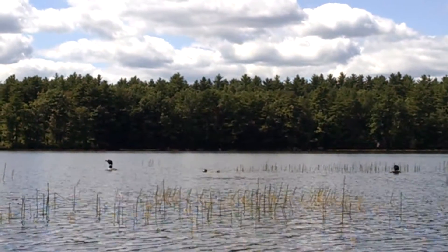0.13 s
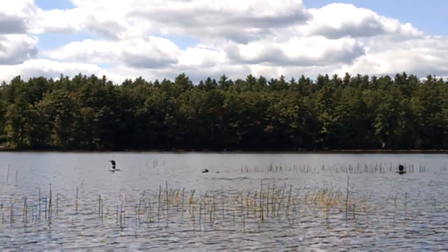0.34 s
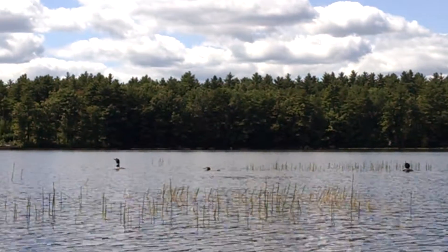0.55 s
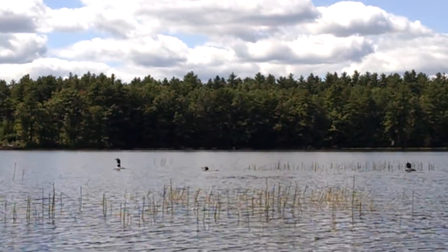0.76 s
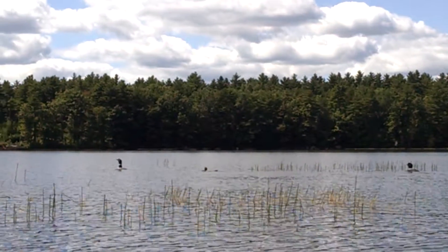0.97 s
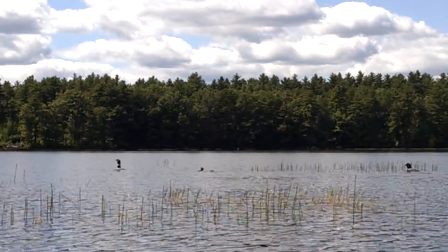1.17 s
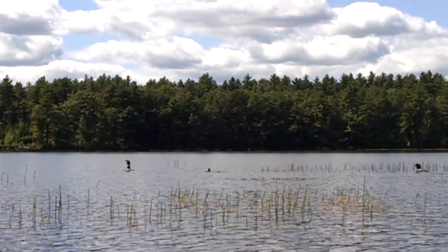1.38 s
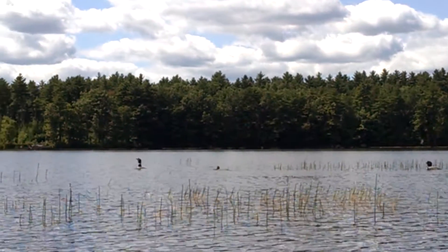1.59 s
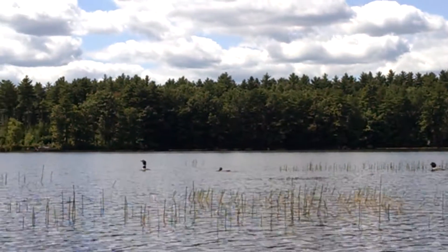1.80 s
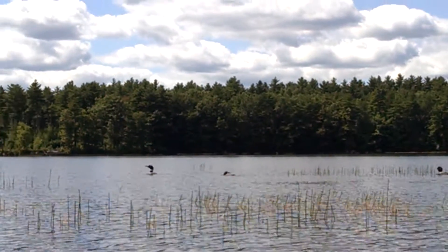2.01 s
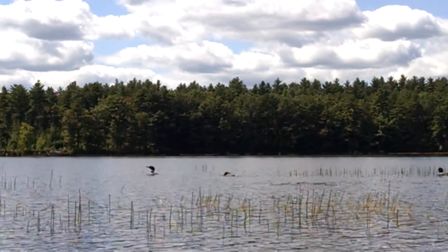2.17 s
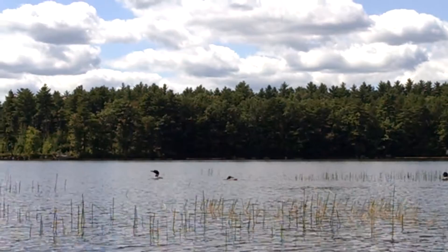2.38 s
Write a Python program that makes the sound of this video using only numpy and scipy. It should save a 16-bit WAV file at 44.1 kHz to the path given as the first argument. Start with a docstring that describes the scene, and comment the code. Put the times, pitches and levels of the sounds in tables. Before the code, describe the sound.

One clear, flute-like loon wail on an open lake: rising note, abrupt break to a higher held note, falling end. Faint wooded-shore echo on the right, quiet outdoor air, low drone and small wind thumps in a stereo microphone.

```python
"""A loon wails once across a calm lake, over wind in the microphone ports, a faint hush and a low drone.
It opens on a low glide, breaks into a rising note that first doubles its period, breaks up to a
high note with small ticks, and breaks back down to a falling one: all stacks of gliding sine harmonics.
From 0.765 s the wooded far shore on the right returns the call, dulled, delayed and blurred.
Wind and hush are shaped noise, the wind thumping in four gusts; the drone is noise through a resonator."""
import sys
import numpy as np
from scipy import signal
from scipy.fft import rfft, irfft, next_fast_len
from scipy.io import wavfile

SR = 44100
rng = np.random.default_rng(int(sys.argv[2]) if len(sys.argv) > 2 else 0)


def transcribe(u):
    """Save the signal u as a 16-bit wav file named by the first command-line argument.

    u: samples, shape (n,) or (channels, n), limited to [-1, 1]; the rate is SR.
    q: integer samples, one column per channel.
    """
    v = np.clip(np.atleast_2d(u).T, -1, 1)
    q = np.round(v * 32767).astype(np.int16)
    wavfile.write(sys.argv[1], SR, q)


N = 108045
T = np.arange(N) / SR  # s

# Voice breaks and the end of the call, and the length of each crossfade (s)
FIRST_BREAK_S, BREAK_UP_S, BREAK_DOWN_S, END_S, BREAK_FADE_S = .207, .842, 1.587, 1.915, 0.0075
UPPER_FLICKER_DB = 1.2  # spread of the flicker in the upper harmonics
# Small ticks in the high note. Each row: start in seconds, peak level in dB.
TICKS = [(0.912, -50), (.995, -49), (1.066, -50), (1.167, -47), (1.228, -49), (1.292, -49), (1.336, -53),
         (1.38, -54), (1.46, -49), (1.529, -50)]


def from_db(db):
    """Decibels to gain."""
    return 10 ** (np.asarray(db) / 20)


def rms_one(x):
    """Scale to unit rms."""
    return x / np.sqrt(np.mean(x ** 2) + 1e-20)


def in_time(rows):
    """Columns of a table as curves over time; the first column is seconds."""
    s, *columns = np.transpose(rows)
    return [np.interp(T, s, c) for c in columns]


def at_hz(points, hz):
    """Read a spectrum on a log-frequency axis."""
    table_hz, values = np.array(points).T
    return np.interp(np.log(np.maximum(hz, 1)), np.log(table_hz), values)


def drift(rate_hz):
    """Slow chance of unit spread: white noise through two equal one-pole low-passes."""
    r = np.exp(-2 * np.pi * rate_hz / SR)
    noise = rng.standard_normal(N + SR)
    return rms_one(signal.lfilter([1], [1, -2 * r, r * r], noise)[SR:])  # filter settles for 1 s


def low_pass(x, cut_hz):
    """Gentle second-order low-pass."""
    return signal.sosfilt(signal.butter(2, cut_hz, fs=SR, output="sos"), x)


def gate(start, end):
    """On and off with short linear fades centred on start and end."""
    fade_in = np.clip((T - start) / BREAK_FADE_S + .5, 0, 1)
    fade_out = np.clip((end - T) / BREAK_FADE_S + .5, 0, 1)
    return fade_in * fade_out


def bump(peak_s, before_s, after_s):
    """A Gaussian hump with its own width on either side of the peak."""
    return np.exp(-((T - peak_s) / np.where(T < peak_s, before_s, after_s)) ** 2)


def loon():
    """Four notes joined by voice breaks, plus the ticks of the high note."""
    opening = opening_note() * gate(-1, FIRST_BREAK_S)
    rise = rising_note() * gate(FIRST_BREAK_S, BREAK_UP_S)
    high, high_phase = high_note()
    high = high * gate(BREAK_UP_S, BREAK_DOWN_S)
    fall = falling_note() * gate(BREAK_DOWN_S, END_S)
    return opening + rise + high + fall + ticks(high_phase)


def note(rows, upper_db, sag=0, dulled_db=0):
    """A slightly wavering harmonic stack coloured by the throat; returns the sound and its phase."""
    # Throat colour the upper harmonics slide through. Each row: frequency in Hz, gain in dB.
    throat = [(1700, -11), (1870, -6), (2000, 6.5), (2300, 3), (2450, 2.5), (2620, -14), (3550, -9.5),
              (3670, 1.5), (3800, -5), (4250, -5.5), (4340, -11.5), (4470, 3.5), (4600, 9), (4780, 6),
              (4900, 8.5), (4970, -2.5), (5000, 11.5), (5110, -0.5), (5250, -8), (5550, 2), (5680, -25),
              (8000, 6), (8250, -3), (8600, 5), (8720, 1.5), (8900, 9.5), (9400, -3), (10200, 5.5),
              (10600, -8), (11700, -7), (12100, 5.5)]
    WAVER_HZ, WAVER_DB = .9, .25  # spread of pitch and level
    SAG_HZ, SAG_DB = 5.8, 1.3  # drop in pitch and level at full sag
    ROUGH_DB, UPPER_ROUGH_DB, ROUGH_HZ = -44, -19.5, 250  # fast random roughness of level and its rate
    EFFORT_BRIGHTENS = 0.42  # extra dB of the upper harmonics per dB of the second
    DULLS_ABOVE_HZ = 4500

    hz, first_db, second_db = in_time(rows)
    sung_hz = hz - SAG_HZ * sag + WAVER_HZ * drift(29.0)
    phase = 2 * np.pi * np.cumsum(sung_hz) / SR
    rough = 1 + from_db(ROUGH_DB) * drift(ROUGH_HZ)
    flicker_db = UPPER_FLICKER_DB * np.array([drift(17.0), drift(45.0)])  # even, odd harmonics
    out = from_db(first_db) * rough * np.sin(phase)
    out += from_db(second_db + flicker_db[1] / 2) * np.sin(2 * phase)

    effort_db = EFFORT_BRIGHTENS * (second_db - second_db.max())
    upper = from_db(second_db + effort_db) * (1 + from_db(UPPER_ROUGH_DB) * drift(ROUGH_HZ))
    for k, db in enumerate(upper_db, 3):
        colour_db = at_hz(throat, k * hz) - dulled_db * (k * hz > DULLS_ABOVE_HZ)
        out += upper * from_db(db + colour_db + flicker_db[k % 2]) * np.sin(k * phase + k * k)
    level_db = WAVER_DB * drift(13.0) - SAG_DB * sag
    return np.sqrt(2) * from_db(level_db) * out, phase  # table levels are rms


def opening_note():
    """The low glide: four harmonics climbing to the first break."""
    # Each row: time in seconds, pitch in Hz, rms level of the fundamental and second harmonic in dB.
    opening = [(0, 387, -51, -37), (.094, 435.5, -43.5, -44), (.142, 468.4, -41, -48.5),
               (.176, 487.5, -38.5, -49), (.205, 546, -38, -55.5)]
    return note(opening, [-18, -38])[0]  # third and fourth harmonics, dB from the second


def rising_note():
    """The rising note; early on its period doubles, which adds half-step lines between harmonics."""
    # Each row: time in seconds, pitch in Hz, rms level of the fundamental and second harmonic in dB.
    rise_rows = [(.212, 582.9, -33.5, -51), (.338, 600.4, -26.5, -43.5), (.436, 609.7, -23.5, -41.5),
                 (.582, 621.3, -22, -39), (.744, 635.2, -21, -39), (.792, 644.8, -20, -38.5),
                 (.82, 657, -20.5, -40.5), (.842, 697, -21, -48)]
    # Third harmonic upward: dB from the second, before throat and effort.
    rise_orders = [-5, -14.5, -40, -22.5, -11.5, -15.5, -16.5, -43.5, -43.5, -39, -29.5, -31.5, -43.5,
                   -39.5, -39, -48, -37.5]
    # Period doubling. Each row: time in seconds, reference rms level in dB.
    doubling_rows = [(0.205, -69.5), (.25, -47), (.3, -44.5), (0.339, -43), (0.375, -70.5)]
    # Its half-step lines. Each row: multiple of the pitch, level in dB from that reference.
    half_lines = [(.5, -20.5), (1.5, -0.5), (2.5, -27.5), (3.5, -23), (4.5, -17.5), (6.5, -25.5),
                  (7.5, -25), (8.5, -20.5), (9.5, -22.5)]
    DOUBLING_DULLS_DB = 6.5  # the half-step lines take strength from the high harmonics
    HIGH_HALVES_S, HIGH_HALVES_FADE_S = 0.23, .05  # the high half-step lines fade in later

    doubling = from_db(in_time(doubling_rows)[0]) * gate(doubling_rows[0][0], doubling_rows[-1][0])
    dulled_db = DOUBLING_DULLS_DB * np.sqrt(doubling / doubling.max())
    rise, phase = note(rise_rows, rise_orders, dulled_db=dulled_db)
    later = np.clip((T - HIGH_HALVES_S) / HIGH_HALVES_FADE_S, 0, 1)
    for k, db in half_lines:
        line = from_db(db + UPPER_FLICKER_DB * drift(17.0)) * np.sin(k * phase)
        rise += np.sqrt(2) * doubling * line * (later if k > 7 else 1)
    return rise


def high_note():
    """The high note, with the low register lingering under it and mixing into sum and difference tones."""
    # Each row: time in seconds, pitch in Hz, rms level of the fundamental and second harmonic in dB.
    high_rows = [(.852, 793, -19, -54.5), (.93, 794.9, -18.5, -51.5), (1.13, 786, -19, -51.5),
                 (1.2, 779, -19.5, -54.5), (1.31, 777.8, -19.5, -54), (1.37, 770.4, -20, -57.5),
                 (1.398, 757.4, -22, -56.5), (1.425, 776.4, -20.5, -59.5), (1.5, 765.7, -20.5, -60.5),
                 (1.55, 765.7, -21.5, -63.5), (1.578, 744, -23, -80)]
    # Third harmonic upward: dB from the second, before throat and effort.
    high_orders = [-7, -25, -0.5, -6.5, -15, -21, -29.5, -29.5, -21, -24.5, -20]
    # Lingering low register. Each row: time in seconds, pitch in Hz, reference rms level in dB.
    undertone = [(.845, 623.6, -32.5), (.87, 600.3, -38), (.95, 605.4, -53), (1.02, 615.7, -59.5),
                 (1.44, 593, -68), (1.5, 621, -70.5), (1.55, 618, -45), (1.585, 635, -41.5)]
    # Tones it makes. Each row: multiple of the high note, multiple of the undertone,
    # level in dB from that reference.
    mixing = [(0, 1, -1.5), (2, -1, -6), (1, 1, -18.5), (3, -1, -27), (2, 1, -23)]
    SAG_S, SPRING_S = 0.02, 0.0053  # the note sags before each tick, then springs back

    sag = sum(bump(s, SAG_S, SPRING_S) for s, _ in TICKS)
    high, high_phase = note(high_rows, high_orders, sag)
    under_hz, under_db = in_time(undertone)
    under_phase = 2 * np.pi * np.cumsum(under_hz) / SR
    tones = sum(from_db(db) * np.sin(a * high_phase + b * under_phase) for a, b, db in mixing)
    return high + np.sqrt(2) * from_db(under_db) * tones, high_phase


def ticks(high_phase):
    """Short ringing tones, each peaking in step with the third harmonic of the high note."""
    TICK_HZ, TICK_S, TICK_RING_S = 2233, 0.00053, 0.0058  # pitch, attack, ring
    out = np.zeros(N)
    for s, db in TICKS:
        peak_s = s + TICK_S
        third_phase = 3 * np.interp(peak_s, T, high_phase) + 3 * 3
        tone = np.sin(2 * np.pi * TICK_HZ * (T - peak_s) + third_phase)
        out += from_db(db) * bump(peak_s, TICK_S, TICK_RING_S) * tone
    return out


def falling_note():
    """The last low note, sinking in pitch and level."""
    # Each row: time in seconds, pitch in Hz, rms level of the fundamental and second harmonic in dB.
    fall_rows = [(1.594, 603.8, -26, -40.5), (1.73, 588, -27.5, -41.5), (1.824, 576.6, -29.5, -43),
                 (1.87, 560.4, -32.5, -45.5), (1.89, 557.4, -34.5, -50.5), (1.915, 537, -52, -69)]
    # Third harmonic upward: dB from the second, before throat and effort.
    fall_orders = [1.5, -21.5, -33, -48, -19, -28.5, -27.5]
    return note(fall_rows, fall_orders)[0]


def shore(call):
    """A dull late reflection from the trees on the right, plus faint decaying scatter off the water."""
    # The echo swells and sinks in level. Each row: time in seconds, gain in dB.
    echo_swell = [(1.6, -1), (1.74, -0.5), (1.77, -8), (1.8, 3), (1.825, -11), (1.86, 7), (1.9, -7),
                  (1.93, 5.5), (1.98, -11), (2.03, 12.5), (2.075, -12), (2.12, 8), (2.145, -4.5),
                  (2.17, 11), (2.205, -8), (2.235, 6), (2.29, -5.5), (2.34, 0)]
    ECHO_S, ECHO_CUT_HZ = 0.765, 980
    ECHO_DB, ECHO_LEFT_DB = -28.5, -14.5  # gain at the right, and the left relative to it
    ECHO_FLUTTER_DB = 5.0  # spread of the random flutter before the table begins
    SCATTER_DB, SCATTER_S = -43, .3  # overall gain, time to fall to 1/e

    dull = low_pass(call, ECHO_CUT_HZ)
    flutter_db = ECHO_FLUTTER_DB * drift(18.0)
    swell_db = np.where(T < echo_swell[0][0], flutter_db, in_time(echo_swell)[0])
    delayed = np.interp(T - ECHO_S, T, dull, left=0)
    echo = from_db([[ECHO_DB + ECHO_LEFT_DB], [ECHO_DB]] + swell_db) * delayed

    decay = np.exp(-T / SCATTER_S)
    scatter = from_db(SCATTER_DB) * decay / np.linalg.norm(decay) * rng.standard_normal((2, N))
    return echo + signal.fftconvolve(scatter, dull[None], axes=1)[:, :N]


def wind():
    """Lumpy low-passed noise buffeting the ports, swelling in short gusts."""
    # Gusts. Each row: peak time in seconds, rms level at the peak in dB, time to fall to 1/e in seconds.
    gusts = [(0.281, -38.5, 0.034), (0.988, -33.5, 0.017), (1.898, -35, 0.01), (1.968, -36.5, 0.028)]
    WIND_CUT_HZ, WIND_DB, WIND_LUMP_DB = 78, -51.5, -2.5  # cutoff, steady level, lump size
    low = low_pass(rng.standard_normal(N), WIND_CUT_HZ)
    steady = from_db(WIND_DB + WIND_LUMP_DB * drift(19.0))
    gusting = sum(from_db(db) * bump(s, length, length) for s, db, length in gusts)
    return (steady + gusting) * rms_one(low)


def hush():
    """Broad outdoor noise, partly shared between the ports."""
    # Hush arriving at one port. Each row: frequency in Hz, level in dB per Hz.
    hush_spectrum = [(20, -67), (86, -73), (170, -77), (340, -81.5), (700, -84), (1030, -90), (1900, -100),
                     (3000, -105), (5000, -103), (13000, -107), (15400, -110)]
    # Likeness between the ports. Each row: frequency in Hz, correlation from 0 to 1.
    likeness = [(90, 1), (300, 0.09), (1400, 0.99), (3100, 0.2), (8000, 0.14), (13300, 0.17)]
    hz = np.arange(N // 2 + 1) * SR / N
    alike = np.clip(at_hz(likeness, hz), 0, 1)
    gain = from_db(at_hz(hush_spectrum, hz)) * np.sqrt(SR / 4)
    shared, apart = rfft(rng.standard_normal((2, N))) * gain
    shared = irfft(shared * np.sqrt(1 + alike), N)
    apart = irfft(apart * np.sqrt(1 - alike), N)
    return np.array([shared + apart, shared - apart])


def drone():
    """A narrow low drone, alike in both channels: noise through a two-pole resonator."""
    DRONE_HZ, DRONE_WIDTH_HZ, DRONE_DB = 73.3, 13, -58  # centre, bandwidth, rms level
    r = np.exp(-np.pi * DRONE_WIDTH_HZ / SR)
    w = 2 * np.pi * DRONE_HZ / SR
    noise = rng.standard_normal(N + SR)
    hum = signal.lfilter([1, 0, -1], [1, -2 * r * np.cos(w), r * r], noise)[SR:]
    return from_db(DRONE_DB) * rms_one(hum)


def ports(left, right):
    """The two microphone ports shift phase and balance with frequency, half on each side."""
    # Each row: frequency in Hz, lead of the left port in radians.
    port_lead = [(90, 2.95), (170, 2.7), (260, 1.33), (520, 0.45), (800, .3), (1890, 0.1), (2450, -.75),
                 (3100, -3.1), (3700, -4.8), (4800, -5.4), (5500, -5.0), (8000, -4.6), (10200, -4.0),
                 (12100, -6.3)]
    # Each row: frequency in Hz, left minus right in dB.
    port_balance = [(110, -2.5), (800, -2), (1890, -0.5), (4400, -2), (8000, -0.5), (8800, 8),
                    (10200, -6.5), (12000, 1)]
    size = next_fast_len(N + 4096)
    hz = np.arange(size // 2 + 1) * SR / size
    half = np.exp(.5j * at_hz(port_lead, hz)) * from_db(at_hz(port_balance, hz) / 2)
    left = irfft(rfft(left, size) * half, size)
    right = irfft(rfft(right, size) / half, size)
    return np.array([left, right])[:, :N]


def scene():
    """Call, wind and hush through the ports; shore echo and drone added after them."""
    call = loon()
    left, right = call + wind() + hush()
    return ports(left, right) + shore(call) + drone()


def record(dry):
    """A steep elliptic low-pass cuts the top."""
    CUTOFF_HZ = 15530
    return signal.sosfilt(signal.ellip(12, .2, 80, CUTOFF_HZ, fs=SR, output="sos"), dry)


dry = scene()
out = record(dry)
transcribe(out)
```